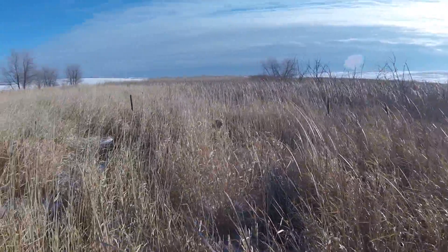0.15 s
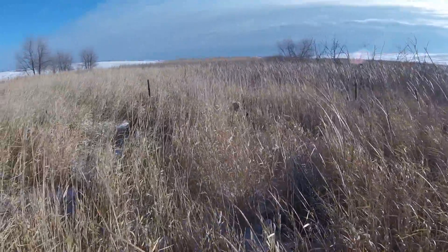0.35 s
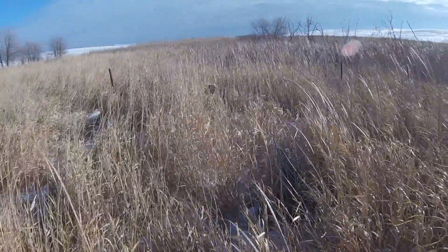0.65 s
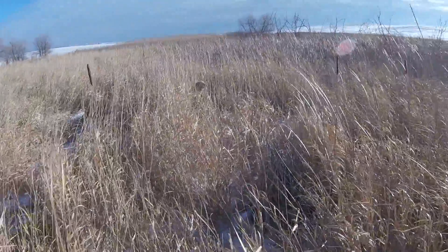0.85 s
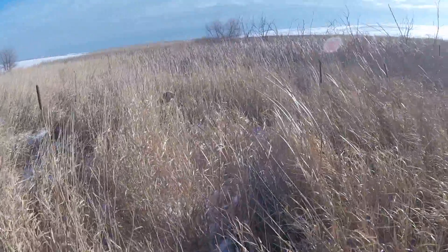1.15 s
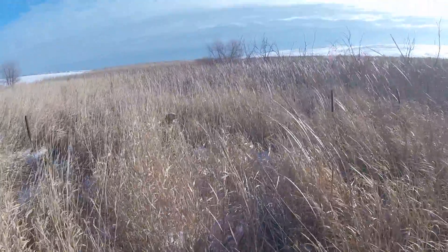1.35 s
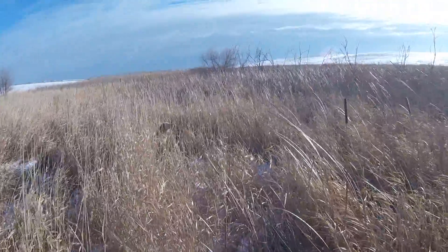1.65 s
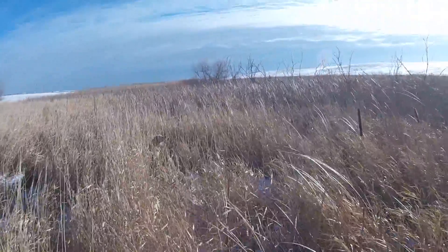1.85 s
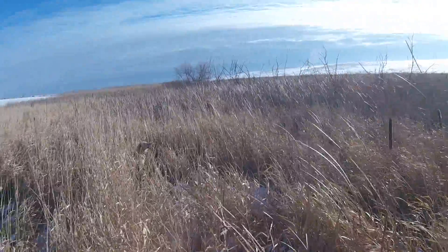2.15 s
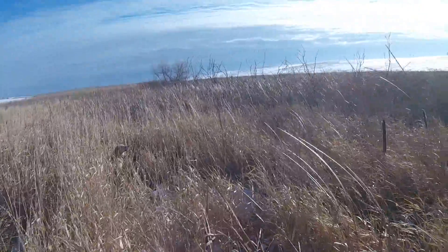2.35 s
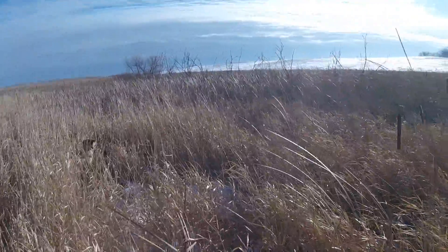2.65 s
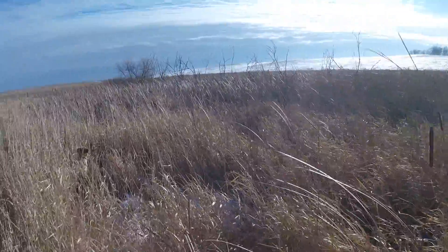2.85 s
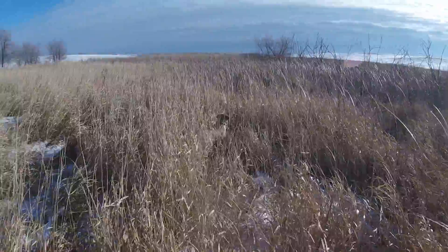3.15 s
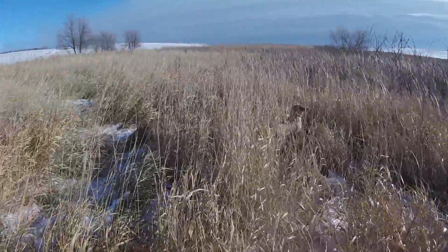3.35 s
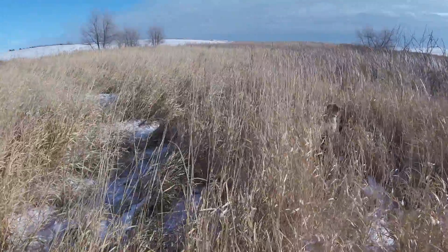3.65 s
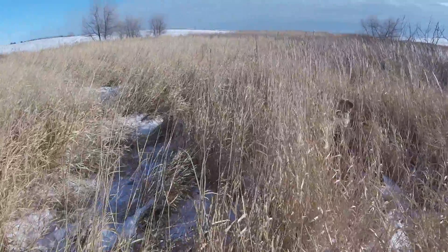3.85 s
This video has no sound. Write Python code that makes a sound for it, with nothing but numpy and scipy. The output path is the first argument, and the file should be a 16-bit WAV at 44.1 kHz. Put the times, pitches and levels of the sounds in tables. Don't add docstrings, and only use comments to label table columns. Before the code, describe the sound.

Low, lumpy wind buffets dominate, with pops and hard slaps close on the microphone. Beneath, thin grass swishes and ticks follow a walker's strides outdoors, ending in a quiet lull with soft crusty footsteps.

```python
import sys
import numpy as np
from scipy import signal
from scipy.fft import rfft, irfft, next_fast_len
from scipy.io import wavfile
from scipy.ndimage import uniform_filter1d, map_coordinates

SR = 44100
rng = np.random.default_rng(int(sys.argv[2]) if len(sys.argv) > 2 else 0)


def put_to_file(sound):
    columns = np.atleast_2d(sound).T
    safe = np.clip(columns, -1, 1)
    whole_steps = np.round(safe * 32767)
    wavfile.write(sys.argv[1], SR, whole_steps.astype(np.int16))


def undo_db(level):
    steps = np.asarray(level, float) / 20
    return 10 ** steps


N = 176400

# time_s, strength_db, small_over_large_eddies_db
WIND = [(0, -19.5, -8), (.1, -26.5, -12.5), (.35, -36.5, -11), (0.499, -25.5, -15), (.77, -22, -8),
        (.92, -27.5, -12.5), (1.1, -26.5, -10.5), (1.46, -25, -10), (1.7, -22.5, -8.5), (2.15, -26, -11.5),
        (2.32, -27.5, -11), (2.58, -22.5, -9), (2.8, -26, -8), (3.05, -36.5, -14.5), (3.3, -49, -16),
        (4, -53, -6.5)]
# centre_s, width_s, level_db
BUFFETS = [(0.017, 0.014, -19.5), (0.151, 0.021, -15), (0.203, 0.016, -24.5), (0.289, 0.012, -27.5),
           (0.321, 0.012, -29), (0.416, 0.012, -19.5), (0.454, 0.012, -18), (0.509, 0.017, -15),
           (0.55, 0.027, -22.5), (0.602, 0.016, -18), (0.695, 0.012, -16.5), (0.717, 0.018, -12.5),
           (0.755, 0.015, -18), (0.84, 0.019, -21.5), (0.982, 0.021, -16), (1.014, 0.025, -12),
           (1.056, 0.014, -15), (1.184, 0.015, -17), (1.246, 0.014, -11.5), (1.275, 0.023, -16.5),
           (1.336, 0.049, -16), (1.373, 0.016, -12), (1.411, 0.015, -22.0), (1.519, 0.011, -11),
           (1.595, 0.028, -14.5), (1.627, 0.017, -11), (1.68, 0.016, -18.5), (1.726, 0.013, -19),
           (1.782, 0.019, -17.0), (1.812, 0.0092, -24.5), (1.842, 0.0063, -10), (1.89, 0.015, -11.5),
           (1.939, 0.012, -12), (1.978, 0.0086, -21.5), (2.025, 0.014, -17), (2.085, 0.031, -20.0),
           (2.116, 0.008, -17.5), (2.15, 0.014, -30), (2.182, 0.023, -18.0), (2.232, 0.021, -13.5),
           (2.26, 0.018, -15.5), (2.351, 0.011, -22), (2.445, 0.017, -17), (2.49, 0.014, -13.5),
           (2.537, 0.022, -15), (2.563, 0.01, -20.0), (2.612, 0.024, -18.5), (2.65, 0.021, -9.5),
           (2.709, 0.015, -21.5), (2.783, 0.0063, -37), (2.894, 0.01, -15.5), (2.977, 0.0077, -32.0),
           (3.05, 0.014, -28.0), (3.079, 0.014, -22.5), (3.141, 0.018, -30.0), (3.213, 0.029, -33),
           (3.268, 0.013, -32.5), (3.397, 0.0075, -43), (3.425, 0.011, -32.5), (3.924, 0.027, -49)]
# freq_hz, density_db_per_hz
RUMBLE = [(11, -52.5), (18, -14), (38, 0.5), (59, -4), (102, -1), (250, -19), (320, -45), (550, -120)]
# freq_hz, density_db_per_hz
FLUTTER = [(60, -29.5), (150, -4.5), (250, -2), (500, -15), (1000, -33), (1600, -45), (3000, -99),
           (5000, -125)]
# freq_hz, density_db_per_hz
BREEZE = [(15, -51), (30, -6), (50, 4.5), (80, -17.5), (140, -29.5), (400, -120)]
# start_s, length_s, level_db
STRIDES = [(-.2, 0.29, -42), (0.17, 0.18, -52.5), (0.498, 0.087, -47), (0.717, 0.35, -40),
           (1.39, 0.063, -50.5), (1.49, 0.026, -48.5), (1.563, 0.12, -55), (1.694, 0.29, -41),
           (2.399, 0.32, -46.5), (3.012, 0.32, -54), (3.36, 0.27, -45.5), (3.578, 0.078, -44),
           (3.627, 0.079, -38.5), (3.87, 0.12, -52)]
# freq_hz, gain_db
HOUSING = [(900, -16.5), (2200, -17), (4500, -19.5), (5350, -5.5), (9900, -14.5), (11000, -26),
           (13000, -28.5), (14000, -30)]
# centre_s, width_s, level_db
POPS = [(0.035, 0.0072, -38), (0.152, 0.011, -56), (0.517, 0.0063, -39), (0.616, 0.0093, -47),
        (0.712, 0.0071, -32.0), (0.759, 0.008, -47), (0.825, 0.0086, -41), (1.014, 0.0057, -27.5),
        (1.276, 0.007, -41), (1.325, 0.004, -44), (1.344, 0.006, -39), (1.372, 0.023, -42.5),
        (1.526, 0.0055, -40), (1.584, 0.0098, -42), (1.597, 0.006, -38.0), (1.624, 0.006, -43),
        (1.644, 0.0065, -37.5), (1.705, 0.01, -41), (1.761, 0.017, -36.5), (1.845, 0.0096, -32.0),
        (1.895, 0.0085, -35), (1.94, 0.0046, -36), (2.072, 0.012, -47.5), (2.19, 0.005, -41),
        (2.231, 0.0043, -48), (2.263, 0.0051, -30.5), (2.447, 0.0064, -41), (2.477, 0.0069, -38.5),
        (2.489, 0.0048, -28), (2.516, 0.0075, -35.0), (2.53, 0.006, -34.0), (2.551, 0.005, -30),
        (2.594, 0.006, -35), (2.608, 0.0091, -36), (2.624, 0.005, -45), (2.645, 0.0073, -33.0),
        (2.661, 0.0072, -29), (2.727, 0.0056, -42.0)]
# freq_hz, density_db_per_hz
POP_COLOUR = [(120, 3), (300, 0.5), (550, -1.5), (1000, -7.5), (1700, -11), (2600, -42), (4000, -60),
              (7000, -125)]
# centre_s, width_s, level_db
SPITS = [(.712, 0.0052, -39), (1.042, .005, -55), (1.073, .005, -55), (1.274, 0.0058, -56),
         (1.320, 0.0034, -45), (1.349, 0.0052, -55), (1.376, 0.0045, -54), (1.624, 0.0045, -58),
         (1.643, 0.0041, -55), (1.761, 0.0045, -68), (1.845, 0.0068, -48), (1.895, 0.0064, -52),
         (1.933, 0.0045, -59), (1.992, 0.0031, -52), (2.269, 0.0073, -54.5), (2.487, 0.0036, -52),
         (2.516, 0.0053, -51), (2.529, 0.0066, -52), (2.548, 0.014, -49.5), (2.568, .005, -59),
         (2.609, 0.0036, -50), (2.644, 0.016, -52.5), (2.661, 0.0059, -48.5), (2.727, .01, -57.5)]
# freq_hz, density_db_per_hz
SPIT_COLOUR = [(400, -17), (900, 8.5), (1500, -3.5), (2400, -7), (3400, -20.5), (5000, -25), (9000, -120)]
# time_s, peak_db, brightness_0_to_1
SNAPS = [(.2435, -30, .3), (.2475, -32, .55), (.2515, -35, .5), (.2797, -30, .97), (.5462, -33, .9),
         (.5771, -31, .95), (.6759, -35, .95), (.775, -29, .9), (.812, -31, .85), (.873, -30, .7),
         (1.1024, -21, .85), (1.1292, -28, .8), (1.1322, -19, .84), (1.2180, -34, .7), (1.432, -34, .8),
         (1.4541, -37, .95), (1.4965, -30, .9), (1.500, -29, .88), (1.5045, -32, .9), (1.516, -34, .9),
         (1.549, -35, .95), (1.620, -35, .9), (1.644, -34, .95), (2.0088, -32, .95), (2.3256, -40, .9),
         (3.3159, -36, .9), (3.8985, -35, .95)]
# time_s, peak_db, width_s
SLAPS = [
    (.7118, -8, .00034),
    (1.8447, -7, .00042),
    (2.6612, -13, .0004),
]
# time_s, peak_db
CRUNCH = [(3.443, -41), (3.474, -48), (3.498, -44), (3.512, -39.5), (3.578, -52), (3.704, -46),
          (3.72, -44.5), (3.731, -46), (3.771, -47), (3.817, -48), (3.859, -52), (3.93, -53)]
# freq_hz, density_db_per_hz
CRUST = [(150, -22), (350, 10), (600, 12), (1100, -8), (2000, -62), (6000, -110)]
# freq_hz, share_lost_0_to_1
DROPOUTS = [(2000, 0), (3800, .07), (4800, 0), (9600, 0), (10800, .4), (12500, .42), (13800, .55)]

LULL_DB, EVENNESS = -1.5, 0.64
FLUTTER_GROWS, FLUTTER_LAG_S = 1.115, 0.029
LUMP_DB, OWN_LUMP_DB, FLICK_DB = 0.8, 1.2, 2.5
BREEZE_DB = -48
ATTACK_S, RELEASE_DB_PER_S, REST_DB = 0.06, 116, -56
GRAINS_DB, GRAIN_SPREAD_DB = -7, 6.5
SETTLE_DB = -58
PORT_HZ, PORT_WIDTH_HZ = 6534, 527
POP_DB, POP_TRIM_S = 9, 0.0032
SNAP_DB, SNAP_T60_S, CRUNCH_T60_S = 5.5, 0.005, 0.025
SHOULDER = 0.5
PREAMP_TOP, PREAMP_KNEE = 0.62, 4
TOP_HZ = 14000
CEILING_HZ, CEILING_HZ_PER_DB, CEILING_WANDER_HZ = 14750, 52, 200


def unit(x):
    return x / np.sqrt(np.mean(x ** 2) + 1e-20)


def along(points, hz):
    f, v = np.transpose(points)
    return np.interp(np.log(hz + 1), np.log(f + 1), v)


def wobble(rate):
    knots = rng.standard_normal(int(N * rate / SR) + 4)
    return map_coordinates(knots, [np.arange(N) * rate / SR])


def coloured(x, gain):
    m = 2 * next_fast_len(N // 2 + SR // 8)
    cepstrum = irfft(np.log(gain(np.fft.rfftfreq(m, 1 / SR)) + 1e-6), m)
    cepstrum[1:m // 2] *= 2
    cepstrum[m // 2 + 1:] = 0
    return irfft(rfft(x, m) * np.exp(rfft(cepstrum)), m)[:N]


def noise(spectrum):
    return unit(coloured(rng.standard_normal(N), lambda hz: undo_db(along(spectrum, hz))))


def bursts(times, gains, t60_s):
    t = np.arange(2048)
    rows = rng.standard_normal((len(times), len(t))) * undo_db(-60 * t / SR / t60_s)
    scale = gains * np.sqrt(t60_s * SR / 14) / np.linalg.norm(rows, axis=1)
    rows *= scale[:, None]
    at = np.round(times * SR).astype(int)[:, None] + t
    return np.bincount(at.ravel(), rows.ravel(), N + SR)[:N]


def swells(rows, trim_s):
    t, power = np.arange(N) / SR, np.zeros(N)
    for s, width, db in rows:
        near = slice(max(round((s - 0.15) * SR), 0), round((s + 0.15) * SR))
        u = (t[near] - s) / max(width - trim_s, 0.001)
        power[near] += undo_db(2 * db) * np.exp(-np.log(16) * u ** 2)
    return power


def wind():
    s, db, ragged_db = np.transpose(WIND)
    t = np.arange(N) / SR
    steady_power = undo_db(2 * (np.interp(t, s, db) + LULL_DB))
    strength_db = 10 * np.log10(steady_power + swells(BUFFETS, trim_s=0.0038))
    recent_db = uniform_filter1d(strength_db, round(FLUTTER_LAG_S * SR))
    small_db = np.interp(t, s, ragged_db) + FLUTTER_GROWS * (recent_db + 14.0) - 13.0
    lumps_db = LUMP_DB * wobble(19)

    roll = noise(RUMBLE)
    envelope = uniform_filter1d(abs(signal.hilbert(roll)), size=SR // 100)
    roll = roll / (envelope + 0.082) ** EVENNESS
    rumble = unit(undo_db(lumps_db + OWN_LUMP_DB * wobble(25.3)) * roll)

    flicker_db = OWN_LUMP_DB * wobble(30.22) + FLICK_DB * wobble(110)
    flutter = unit(undo_db(lumps_db + flicker_db) * noise(FLUTTER))
    breeze = undo_db(BREEZE_DB + 3 * wobble(8)) * noise(BREEZE)
    return undo_db(strength_db) * rumble + undo_db(small_db) * flutter + breeze


def housing(hz):
    ring = hz * PORT_WIDTH_HZ / np.hypot(PORT_HZ ** 2 - hz ** 2, hz * PORT_WIDTH_HZ)
    return np.hypot(undo_db(along(HOUSING, hz)), ring ** 2)


def grass():
    t = np.arange(N) / SR
    power = undo_db(2 * REST_DB)
    for s, length, db in STRIDES:
        rise = 1 / (1 + np.exp(np.clip((s - t) / (ATTACK_S / 3), -50, 50)))
        fall_db = RELEASE_DB_PER_S * np.maximum(t - s - length, 0)
        power = power + (rise * undo_db(db - fall_db)) ** 2
    hits = (rng.random(N) < 1500 / SR) * rng.choice([-1, 1], N)
    ticks = hits * undo_db(GRAIN_SPREAD_DB * np.minimum(rng.exponential(size=N), 3))
    brush = rng.standard_normal(N) + undo_db(GRAINS_DB) * unit(ticks)
    swish = unit(undo_db(1.32 * wobble(45)) * coloured(brush, housing))
    low_stalks = noise([(500, -26), (1200, 0), (3500, -3), (5000, -32)])
    settle = undo_db(SETTLE_DB - 10.5 + 2.6 * wobble(5.16)) * low_stalks
    return np.sqrt(power) * swish + settle


def pops():
    swing = np.sign(noise([(100, 1.5), (600, -3), (2500, -25.5)]))
    hiss = np.sign(rng.standard_normal(N))
    body = np.sqrt(swells(POPS, POP_TRIM_S)) * swing
    spit = np.sqrt(swells(SPITS, POP_TRIM_S)) * hiss
    body = coloured(body, lambda hz: undo_db(POP_DB + along(POP_COLOUR, hz)))
    return body + coloured(spit, lambda hz: undo_db(19.5 + along(SPIT_COLOUR, hz)))


def snaps():
    s, db, bright = np.transpose(SNAPS)
    thin = bursts(s, undo_db(db + SNAP_DB) * bright, SNAP_T60_S)
    thin = coloured(thin, lambda hz: 1 / (1 + (4200 / (hz + 1)) ** 4) / (1 + (hz / 9000) ** 2))
    thick = bursts(s, undo_db(db + SNAP_DB + 17) * (1 - bright), SNAP_T60_S)
    thick = coloured(thick, lambda hz: 1 / (1 + (hz / 3500) ** 4) * hz / (hz + 900))
    return coloured(thin + thick, housing) * undo_db(10)


def slaps():
    t, pressure = np.arange(N) / SR, np.zeros(N)
    for s, db, width in SLAPS:
        u = (t - s) / width
        pressure += undo_db(db) * (SHOULDER * u ** 2 - 1) * np.exp(-u ** 2 / 2)
    return pressure


def crunch():
    s, db = np.transpose(CRUNCH)
    return coloured(bursts(s, undo_db(db + 8.5), CRUNCH_T60_S), lambda hz: undo_db(along(CRUST, hz)))


def scene():
    return (wind() + grass() + pops() + snaps() + slaps() + crunch())[None]


def roll_off(x):
    return signal.sosfilt(signal.butter(12, 14120, fs=SR, output="sos"), x)


def record(dry):
    rounded = dry[0] / (1 + abs(dry[0] / PREAMP_TOP) ** PREAMP_KNEE) ** (1 / PREAMP_KNEE)
    limited = coloured(rounded, lambda hz: 1 / (1 + (hz / TOP_HZ) ** 60))
    hz, _, z = signal.stft(limited, SR, nperseg=2048)
    cells = rng.random((len(hz) // 4 + 1, z.shape[1] // 2 + 1))
    cells = cells.repeat(4, axis=0).repeat(2, axis=1)[:len(hz), :z.shape[1]]
    survives = cells >= along(DROPOUTS, hz)[:, None]

    power = uniform_filter1d(abs(z) ** 2, size=3, axis=1) + 1e-20
    treble_db = 10 * np.log10(power[hz > 4000].sum(0) / power.sum(0))
    wander = CEILING_WANDER_HZ * rng.standard_normal(z.shape[1])
    ceiling = CEILING_HZ + CEILING_HZ_PER_DB * treble_db + wander
    kept = signal.istft(z * survives * (hz[:, None] < ceiling), SR, nperseg=2048)[1][:N]
    return roll_off(kept[None])


dry = scene()
out = record(dry)
put_to_file(out)
```